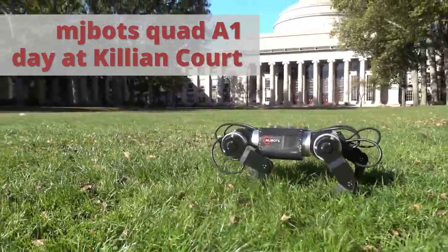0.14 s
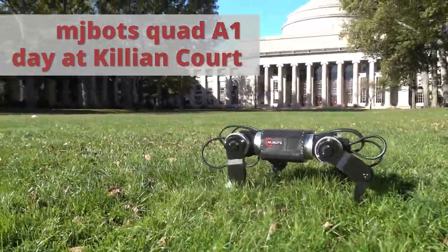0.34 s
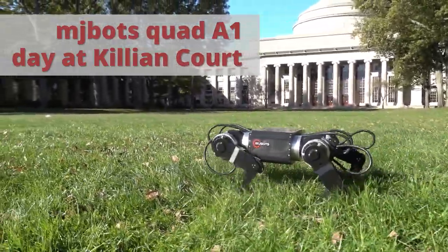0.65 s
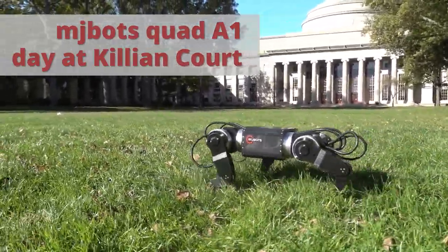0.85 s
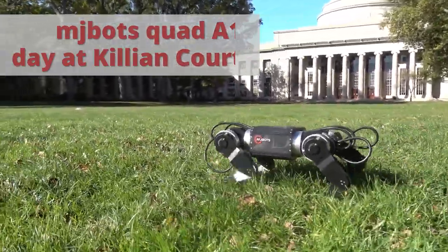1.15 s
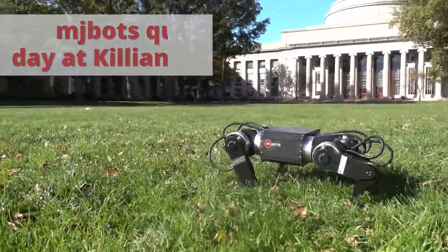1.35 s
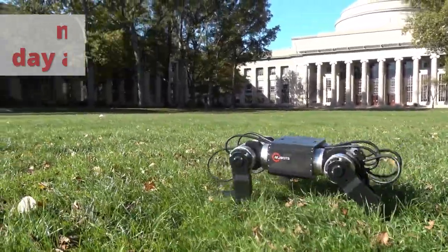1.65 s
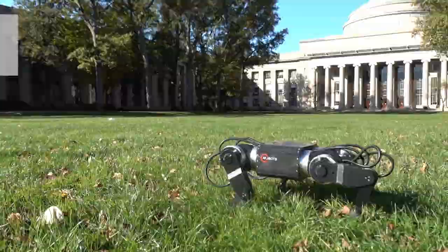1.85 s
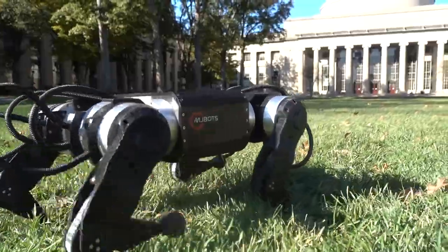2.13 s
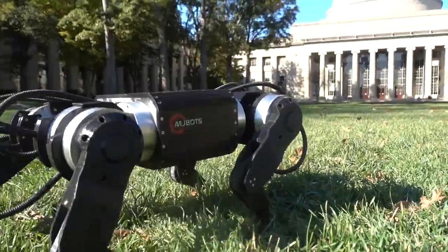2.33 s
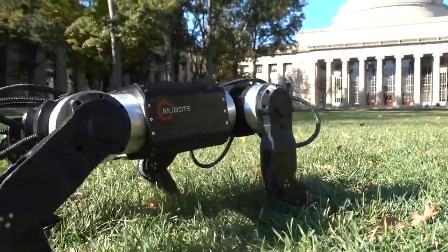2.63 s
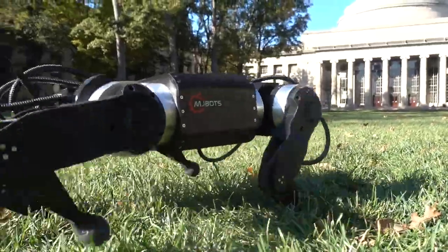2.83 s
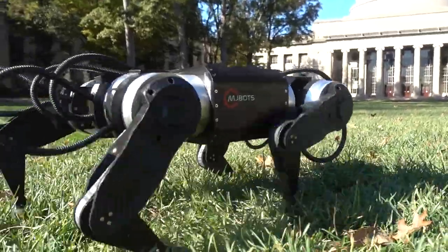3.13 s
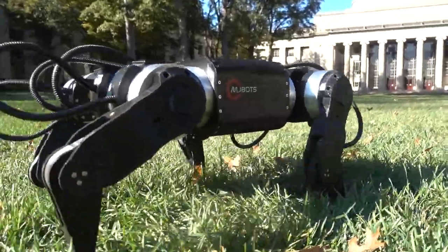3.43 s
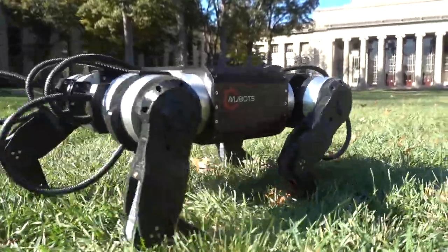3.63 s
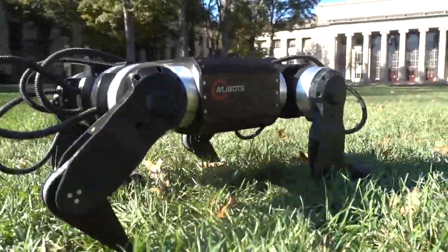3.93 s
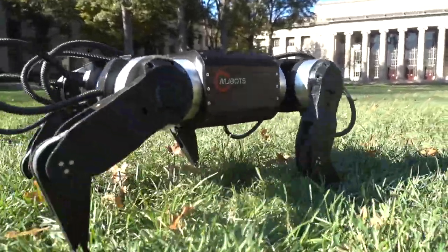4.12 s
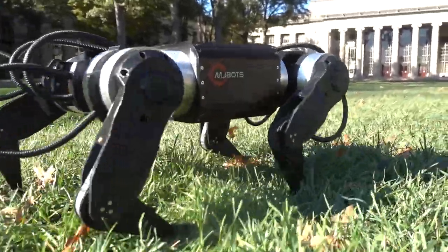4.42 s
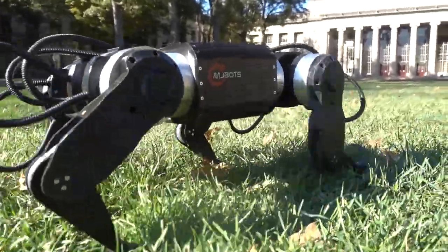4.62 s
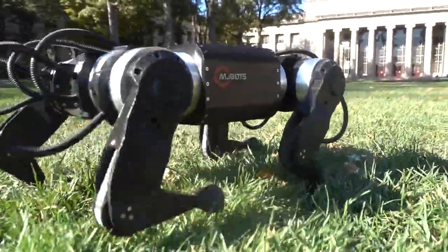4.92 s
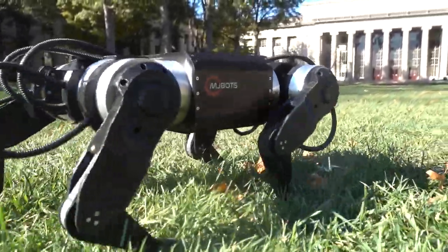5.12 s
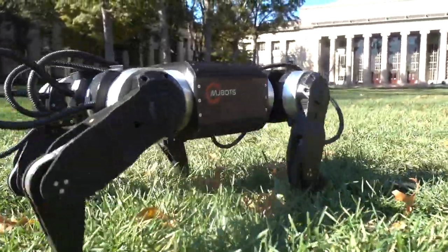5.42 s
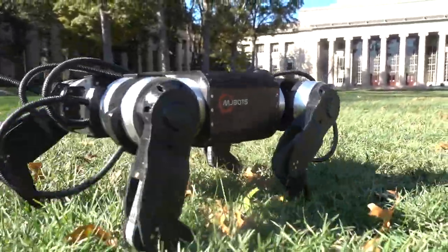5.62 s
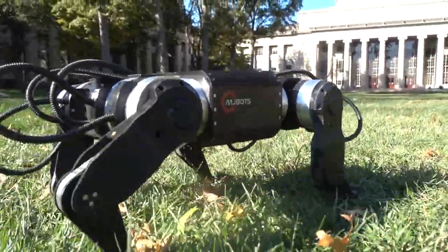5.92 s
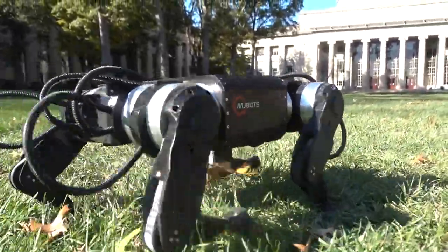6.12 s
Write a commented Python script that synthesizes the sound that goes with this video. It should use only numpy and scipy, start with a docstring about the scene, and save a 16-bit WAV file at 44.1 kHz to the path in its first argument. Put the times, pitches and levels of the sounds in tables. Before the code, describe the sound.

Geared leg motors whine and clack as a walking robot's feet swish and thud through a lawn, first some way off, then very near.

```python
"""On a lawn, a four-legged robot trots some metres off, then right beside the listener.
A light breeze rumbles underneath. The feet crack dry stalks, brush through grass and leaves,
and thud on the turf. In each stride the gears whirr, clack as their slack closes,
and whine up and down as a leg lifts, then again as it lowers."""
import sys
import numpy as np
from scipy import signal
from scipy.fft import rfft, irfft, next_fast_len
from scipy.io import wavfile
from scipy.ndimage import uniform_filter1d, map_coordinates

SR = 44100
rng = np.random.default_rng(int(sys.argv[2]) if len(sys.argv) > 2 else 0)


def master_out(mix):
    """Clip the mix to full scale and print it as 16-bit PCM to the path in sys.argv[1]."""
    frames = np.transpose(np.atleast_2d(mix))
    ceiling = np.clip(frames, -1, 1)
    pcm = np.round(ceiling * 32767).astype(np.int16)
    wavfile.write(sys.argv[1], SR, pcm)


N = 276066
TIME = np.arange(N) / SR
CLOSE_S = 1.95  # from here on the robot is close
LAND_S = 0.1075  # time from a stride's take-off to its landing


def amp(db):
    """Turn decibels into a volume multiplier."""
    return 10 ** (np.asarray(db) / 20)


def unit(x):
    """Scale a sound so that its first channel has an average strength (rms) of 1."""
    return x / np.sqrt(np.mean(np.atleast_2d(x)[0] ** 2) + 1e-20)


def wobble(per_s):
    """A smooth random curve through per_s random values a second."""
    values = rng.standard_normal(int(N * per_s / SR) + 4)
    return map_coordinates(values, [TIME * per_s], mode="nearest")


def held(t, rise_s, length_s, fade_s):
    """A volume that rises from t = 0, holds until length_s and dies away."""
    return np.clip(t / rise_s, 0, 1) * np.exp(-np.maximum(t - length_s, 0) / fade_s)


def filtered(x, response):
    """Turn each pitch in a sound up or down by the multiplier response(hz)."""
    size = next_fast_len(N + 8192)
    return irfft(rfft(x, size) * response(np.fft.rfftfreq(size, 1 / SR)), size)[..., :N]


def coloured(x, colour):
    """Shape a sound's bass and treble along rows of pitch_hz, level_db."""
    pitch_hz, level_db = np.transpose(colour)
    return filtered(x, lambda hz: amp(np.interp(np.log(hz + 1), np.log(pitch_hz + 1), level_db)))


def noise(colour, patchy_db, patch, envelope=1):
    """Mid and side noise whose tone shifts in random patches, sized (pitch bands, time steps)."""
    bands = signal.stft(envelope * rng.standard_normal((2, N)), nperseg=256)[2]
    drift = rng.standard_normal(bands.shape[1:])
    drift = uniform_filter1d(uniform_filter1d(drift, patch[0], axis=0), patch[1], axis=1)
    drift = unit(drift.ravel()).reshape(drift.shape)
    patchy = signal.istft(bands * amp(patchy_db * drift), nperseg=256)[1][:, :N]
    return unit(coloured(patchy, colour))


def grains(per_s, spread_db, life_s):
    """The volume of many tiny touches, random in time and size, each dying quickly."""
    touches = rng.random(N) < per_s / SR
    sizes = amp(spread_db * np.clip(rng.standard_normal(N), -2, 2))
    energy = signal.lfilter([1], [1, -np.exp(-2 / (life_s * SR))], touches * sizes ** 2 / per_s)
    return unit(np.sqrt(energy))


def ring(tones, t, scatter_db):
    """A struck part's tones, each fading 60 dB in its ring_s: shape (tones, mid and side, samples)."""
    pitch_hz, level_db, ring_s = np.transpose(tones)[:, :, None, None]
    struck_db = level_db + scatter_db * rng.standard_normal((len(tones), 1, 1))
    phase = rng.uniform(0, 2 * np.pi, (len(tones), 2, 1))
    return amp(struck_db - 60 * t / ring_s) * np.sin(2 * np.pi * pitch_hz * t + phase)


def add(track, start_s, sound):
    """Mix a sound into a track at start_s."""
    part = track[:, max(round(start_s * SR), 0):]
    part[:, :sound.shape[1]] += sound[:, :part.shape[1]]


# The tone of the open air: pitch_hz, level_db
AIR_COLOUR = [(25, -37), (100, -17), (350, -2.5), (800, -6), (2000, -2), (5000, -16), (16000, -20.5)]


def air():
    """A faint, steady hush hangs over the open lawn."""
    mid, side = amp(-50.5) * noise(AIR_COLOUR, patchy_db=3.5, patch=(12, 60))
    return np.array([mid, coloured(side, [(300, -17.5), (2000, -5.5)])])


# Puffs of wind: start_s, length_s, level_db
GUSTS = [(0.004, .12, -50.5), (.18, 0.19, -57.5), (0.672, .35, -54.5), (1.167, .14, -53.5),
         (1.45, 0.27, -56), (1.757, 0.32, -60), (2.374, 0.059, -51.5), (2.638, .15, -54),
         (2.772, 0.28, -52), (3.08, 0.44, -60), (3.54, 0.46, -61), (4.204, .35, -59.5), (6.18, .08, -56)]
# The tone of the wind's rumble: pitch_hz, level_db
WIND_COLOUR = [(20, -36), (40, -27), (70, -9), (120, -3.5), (190, 0.5), (300, -2.5), (500, -12.5),
               (1000, -23), (3000, -48)]
# How wide the wind sounds: pitch_hz, side_level_db
WIND_WIDTH = [(60, -9), (150, -6.5), (330, 1.5), (800, 3)]


def breeze():
    """Lumpy gusts rumble on the microphone, differently on the left and the right."""
    calm_power = amp(-65.5) ** 2
    power = calm_power
    for start_s, length_s, level_db in GUSTS:
        power = power + (amp(level_db) * held(TIME - start_s, 0.028, length_s, fade_s=0.046)) ** 2
    lumps = amp(1.8 * wobble(per_s=22))
    mid, side = np.sqrt(power) * lumps * noise(WIND_COLOUR, patchy_db=2, patch=(1, 14))
    gust_share = 1 - calm_power / power
    return np.array([mid, gust_share * coloured(side, WIND_WIDTH)])


# How hard the legs work while far off: time_s, level_db
FAR_EFFORT = [(0.0, -45.5), (0.038, -38.5), (0.194, -54), (0.21, -44), (0.504, -45.5), (0.52, -54),
              (0.542, -40.5), (0.922, -46), (1.394, -41.5), (1.416, -40), (1.95, -37.5)]
# The close strides, which also drive the thuds, clacks and whine. Each sound adds its own level offset.
# start_s, lift_db, lower_db, top_pitch_hz, whine_db, hold_s, takeoff_clack_db, landing_clack_db
STRIDES = [(2.0802, -35, -33, 6460, -34.5, .2, -19.5, -14.5), (2.4812, -35, -34, 6380, -34, 0.21, -16, -30),
           (2.829, -35.5, -33.5, 7000, -37.5, .19, -18.5, -17),
           (3.165, -32.5, -32.5, 7740, -30.5, .23, -16, -20),
           (3.51, -34.5, -32.5, 7170, -34, 0.2, -12.5, -16.5),
           (3.8424, -34, -32.5, 6710, -32, 0.21, -13.5, -21),
           (4.172, -34.5, -32, 6880, -33, 0.21, -12.5, -14.5),
           (4.516, -32.5, -34, 6970, -31.5, 0.21, -14.5, -19.5),
           (4.8485, -34, -32, 7220, -33.5, 0.2, -12.5, -16), (5.192, -34.5, -34, 6790, -31, 0.21, -14, -22),
           (5.4909, -34.5, -32, 7160, -32.5, 0.2, -12.5, -17),
           (5.794, -34.5, -33.5, 6850, -31.5, 0.19, -13.5, -20),
           (6.049, -34.5, -33.5, 6670, -35, .21, -16.5, -16.5)]


def effort():
    """How hard the legs work, far and near: a close stride holds a load and surges at lift and landing."""
    far = amp(np.interp(TIME, *np.transpose(FAR_EFFORT))) * (TIME < CLOSE_S)
    near_power = np.zeros((1, N))
    lead_s = 0.016  # the motors start just before take-off
    t = np.arange(SR // 2) / SR - lead_s
    lift_at_s, lift_width_s, land_width_s = 0.044, 0.016, 0.012
    lift = amp(-2) * np.exp(-0.5 * ((t - lift_at_s) / lift_width_s) ** 2)
    land = amp(-2) * np.exp(-0.5 * ((t - LAND_S) / land_width_s) ** 2)
    for start_s, lift_db, lower_db, _, _, hold_s, *_ in STRIDES:
        hold = amp(-4) * held(t + lead_s, 0.012, lead_s + hold_s, fade_s=0.029)
        strength = amp(np.interp(t, [lift_at_s, LAND_S], [lift_db, lower_db]))
        power = strength ** 2 * (hold ** 2 + lift ** 2 + land ** 2)
        add(near_power, start_s - lead_s, power[None])
    return far, np.sqrt(near_power[0])


# The tone of a cracking stalk: pitch_hz, level_db
STALK_COLOUR = [(800, -20), (2200, -3), (4200, 2), (7000, 0), (16000, -11)]


def stalks(far_effort):
    """Dry stalks crack at random as the robot crosses the far lawn."""
    cracks = grains(per_s=20, spread_db=4, life_s=0.0047)
    return far_effort * amp(-4.5) * noise(STALK_COLOUR, patchy_db=3.5, patch=(6, 6), envelope=cracks)


# A foot sweeps through the grass: start_s, length_s, relative_level_db
SWISHES = [(-.02, 0.057, -34), (0.22, 0.062, -36), (0.28, 0.1, -39.5), (.535, 0.043, -36.5),
           (.65, .07, -37), (0.769, 0.036, -28), (.85, .17, -39), (1.151, 0.033, -30), (1.21, 0.03, -33),
           (1.273, 0.05, -35.5), (1.376, 0.15, -29), (1.716, 0.1, -34), (2.304, 0.25, -57.5),
           (3.05, 0.12, -42.5), (3.202, 0.092, -30.5), (3.79, 0.036, -37.5), (3.99, 0.12, -39.5),
           (4.31, 0.034, -40.5), (4.63, .18, -41), (5.263, 0.071, -32.5), (5.562, .14, -42),
           (6.052, 0.033, -37)]
# The tone of rustling blades: pitch_hz, level_db
GRASS_COLOUR = [(400, -31), (1200, -13.5), (2500, -10.5), (4500, -5.5), (7000, -2), (10000, 1),
                (13000, 0.5), (16000, -2.5)]


def grass(far_effort, near_effort):
    """Blades and dry leaves crackle on the feet: a light touch bends a few, a deep sweep very many."""
    power = amp(-52) ** 2 + (amp(-0.5) * far_effort) ** 2 + (amp(-9.5) * near_effort) ** 2
    for start_s, length_s, swish_db in SWISHES:
        power = power + (amp(swish_db) * held(TIME - start_s, 0.02, length_s, fade_s=0.029)) ** 2
    level_db = 10 * np.log10(power)
    touches = grains(per_s=3000 + 1500 * amp(level_db + 40), spread_db=3.8, life_s=0.0007)
    crackle = noise(GRASS_COLOUR, patchy_db=2.3, patch=(12, 6), envelope=touches)
    return amp(level_db + 2.5 + wobble(per_s=90)) * crackle


# Soft low thumps outside the strides' beat, one as the sound jumps from far to close: start_s, peak_db
STRAY_THUMPS = [(1.064, -43.5), (1.3, -42.5), (1.528, -40.5), (1.948, -38), (2.05, -40), (2.645, -41),
                (2.687, -39), (3.346, -40), (4.345, -40)]
# The tones of the body when a foot lands, also used for the stray thumps: pitch_hz, level_db, ring_s
BODY_TONES = [(200, -24, 0.071), (341.2, -11, 0.13), (385, 1.5, 0.033), (527, -6.5, 0.047),
              (624, -1.5, 0.048)]


def thuds():
    """Rubber feet land on turf and the body booms softly; similar low thumps fall outside the beat."""
    out, t = np.zeros((2, N)), np.arange(SR // 4) / SR
    soft_rise = 1 - np.exp(-t / 0.0064)
    landings = [(start_s + LAND_S, lower_db - 6.5) for start_s, _, lower_db, *_ in STRIDES]
    for start_s, peak_db in landings + STRAY_THUMPS:
        pitch_ratio = np.exp(0.04 * rng.standard_normal())
        hit = ring(BODY_TONES, t * pitch_ratio, scatter_db=3.5).sum(0) * soft_rise
        add(out, start_s, hit / np.abs(hit[0]).max() * amp(peak_db))
    return out


# The tone of the gears close by: pitch_hz, level_db
NEAR_GEAR_COLOUR = [(150, -74), (340, -6), (470, -21.5), (680, -11), (850, -14.5), (1250, -6), (1650, -1),
                    (2200, 0), (2600, -3), (3600, -3), (4900, -8), (5900, -5.5), (8200, -9), (11000, -18),
                    (16000, -24)]
# The tone of the gears far off: pitch_hz, level_db
FAR_GEAR_COLOUR = [(150, -37), (340, -43), (800, -14.5), (1500, -10.5), (2200, -4), (3000, -6),
                   (6000, -10.5), (16000, -20)]


def whirr(far_effort, near_effort):
    """Gear teeth rattle in their cases, as loud as the legs work; from afar they sound thinner."""
    teeth = grains(per_s=3500, spread_db=5, life_s=0.0015)
    near = amp(1.7) * noise(NEAR_GEAR_COLOUR, patchy_db=3, patch=(3, 8), envelope=teeth)
    flicker = amp(0.24 + 1.3 * wobble(per_s=45))
    far = flicker * noise(FAR_GEAR_COLOUR, patchy_db=3, patch=(3, 8), envelope=teeth)
    return near_effort * near + far_effort * far


def gear_tone(top_hz, half_s, waver, rough):
    """One leg move: the motor speeds up and slows again; its tone is strongest near top speed."""
    progress = np.arange(-round(half_s * SR), round(half_s * SR)) / (half_s * SR)  # -1 to 1
    speed = np.cos(progress * np.pi / 2)
    flutter, load = unit(uniform_filter1d(rng.standard_normal((2, len(progress))), size=80))
    phase = 2 * np.pi * np.cumsum(top_hz * speed * (1 + waver * flutter)) / SR
    offset = rng.uniform(0, 2 * np.pi, (2, 1))
    return speed ** 4 * (1 + rough * load) * np.sin(phase + offset)


def whine():
    """The gears sing up and down twice in each close stride: a fast lift, then a slower lowering."""
    out = np.zeros((2, N))
    lift_half_s, lower_half_s = 0.049, 0.065
    for start_s, lift_db, lower_db, top_hz, whine_db, *_ in STRIDES:
        lift_s, lower_s = start_s + 0.047 - lift_half_s, start_s + 0.16 - lower_half_s
        lower_hz = top_hz * 0.88
        add(out, lift_s, gear_tone(top_hz, lift_half_s, waver=0.024, rough=0.8) * amp(whine_db))
        add(out, lower_s, gear_tone(lower_hz, lower_half_s, waver=0.0245, rough=1) * amp(lower_db - 14.5))
        for ratio in (0.255, 0.32):  # slower gears growl underneath
            lift = gear_tone(top_hz * ratio, lift_half_s, waver=0.051, rough=0.13)
            lower = gear_tone(lower_hz * ratio * 1.1, lower_half_s, waver=0.062, rough=0.23)
            add(out, lift_s, lift * amp(lift_db - 2.5))
            add(out, lower_s, lower * amp(lower_db - 13.5))
    return out


# Stray clacks of leg links, feet and dry stalks; knock is the low part, snap the high part.
# start_s, relative_level_db, relative_knock_db, relative_snap_db
STRAY_CLACKS = [(0.2068, -21, -7, -8), (0.2308, -11.5, 2, 7), (0.322, -11, -30, -7.5), (0.389, -23, 1, -11),
                (0.441, -25, -1, -22), (0.5381, -19, -30, -10), (0.9396, -19, -30, -10.5),
                (1.0453, -16.5, -18, -12.5), (1.118, -16.5, -20, -6), (1.216, -19, -29, -9),
                (1.2498, -14.5, -32, -14), (1.318, -21.5, -3, -20), (1.7815, -9, -28, -6),
                (1.825, -11, -12, -1), (1.8363, -7, -30, -1), (2.262, -17, 1, -16),
                (2.3295, -24, -3.5, -10), (2.6864, -11.5, -5, -11.5), (3.3582, -15.5, -8, -28),
                (3.3985, -19, 0, -10), (3.707, -18, 4, -20), (4.3732, -16.5, 1.5, -28),
                (4.968, -16, -9, -29), (5.051, -16, 4, -28), (5.3113, -12, -26, -7), (5.3799, -18, -9, -19),
                (6.2396, -14, -5.5, -13)]
# The tones of a struck leg: pitch_hz, level_db, ring_s
LEG_TONES = [(1770, -4.5, 0.033), (2180, -0.5, 0.015), (2906, 1, 0.013), (3260, -4.5, 0.025),
             (4130, -6, 0.033), (5780, 1.5, 0.021), (7080, -14, 0.004), (7000, 2.5, 0.0065),
             (7800, 1.5, 0.018), (8700, 2, 0.017)]


def clacks():
    """Slack in the gears closes with a hard tick; the leg rings briefly, and dry stalks add a snap."""
    out, t = np.zeros((2, N)), np.arange(SR // 20) / SR
    is_low = np.transpose(LEG_TONES)[0] < 4000
    treble = signal.butter(2, 9500, "high", fs=SR, output="sos")
    middle = signal.butter(2, [3200, 9000], "band", fs=SR, output="sos")
    rise = 1 - np.exp(-(t / 0.00036) ** 2)
    # same columns as the stray clacks
    takeoffs = [(start_s, takeoff_db, -9, -17.5) for start_s, *_, takeoff_db, _ in STRIDES]
    landings = [(start_s + LAND_S, landing_db, -7, -20.5) for start_s, *_, landing_db in STRIDES]
    for start_s, level_db, knock_db, snap_db in takeoffs + landings + STRAY_CLACKS:
        pose = np.exp(0.055 * rng.standard_normal())  # each leg and pose rings at its own pitch
        tones = ring(LEG_TONES, t * pose, scatter_db=2.5)
        crack = rng.standard_normal((2, len(t))) * amp(-60 * t / 0.011)
        tick = tones[~is_low].sum(0) + amp(11) * signal.sosfilt(middle, crack)
        knock = amp(knock_db + 4) * tones[is_low].sum(0)
        snap = amp(snap_db + 25) * signal.sosfilt(treble, crack)
        hit = rise * (tick + knock + snap)
        opening_strength = np.std(hit[0, t < 0.003])
        add(out, start_s, hit / opening_strength * amp(level_db - 8))
    return out


# How wide the robot sounds: pitch_hz, side_level_db
ROBOT_WIDTH = [(60, -18), (250, -33), (800, -20.5), (2000, -14), (3300, -7), (5500, -2), (9000, -10.5),
               (15000, -9.5)]


def scene():
    """Mix everything as mid (what both ears share) and side (how they differ), then as left and right."""
    far, near = effort()
    robot_mid, robot_side = whirr(far, near) + whine() + clacks() + thuds() + grass(far, near) + stalks(far)
    lean = np.where(TIME < CLOSE_S, -0.07, 0.035)  # to the right when far, a little left when close
    robot_side = coloured(robot_side, ROBOT_WIDTH) + lean * robot_mid
    mid, side = np.array([robot_mid, robot_side]) + breeze() + air()
    return np.array([mid + side, mid - side])


def record(dry):
    """The microphone loses the deep bass and the very highest treble."""
    low_cut_hz, top_hz = 42, 16050
    return filtered(dry, lambda hz: (hz < top_hz) * hz ** 2 / np.hypot(hz ** 2, low_cut_hz ** 2))


dry = scene()
out = record(dry)
master_out(out)
```